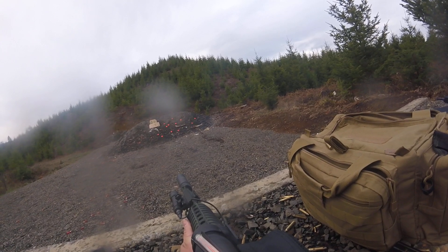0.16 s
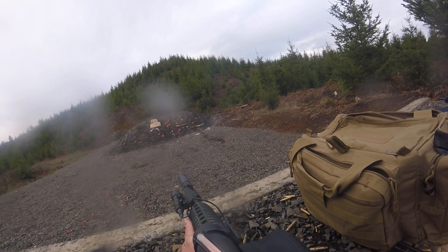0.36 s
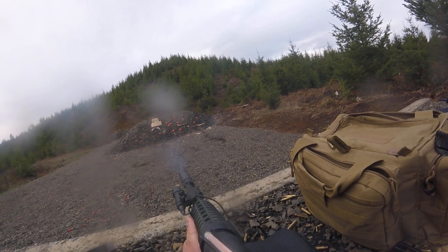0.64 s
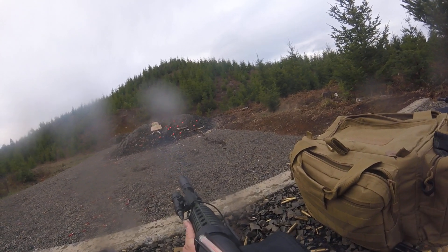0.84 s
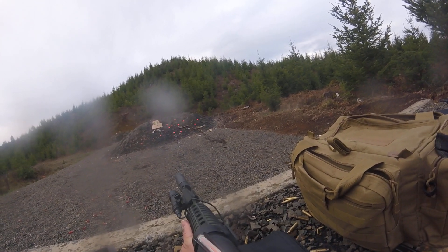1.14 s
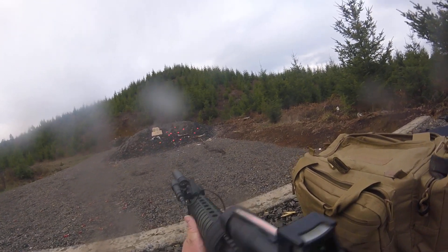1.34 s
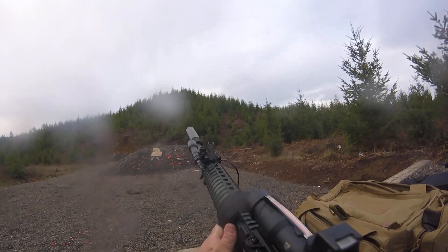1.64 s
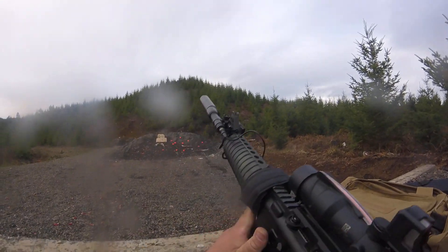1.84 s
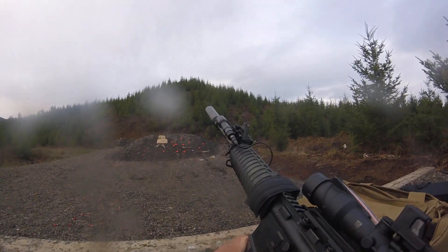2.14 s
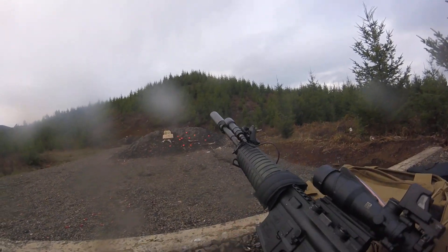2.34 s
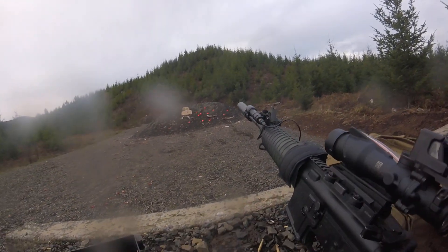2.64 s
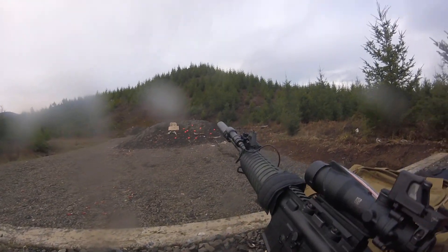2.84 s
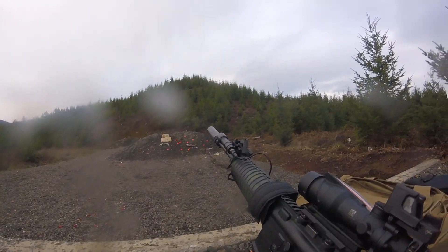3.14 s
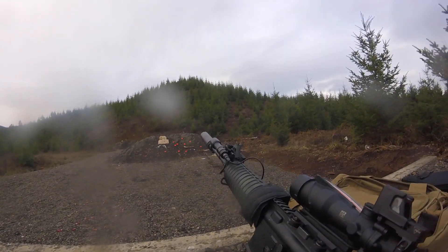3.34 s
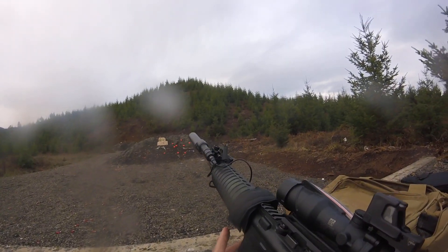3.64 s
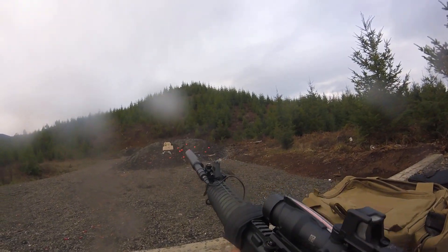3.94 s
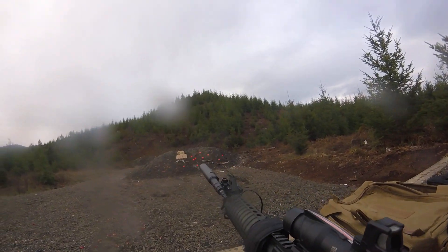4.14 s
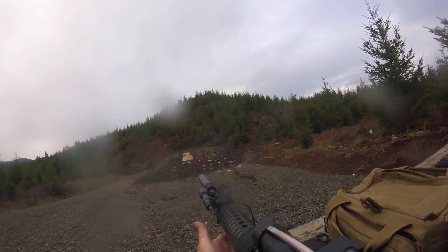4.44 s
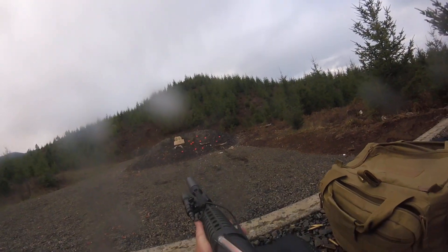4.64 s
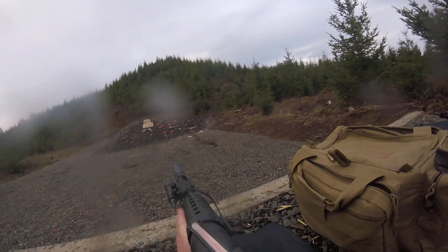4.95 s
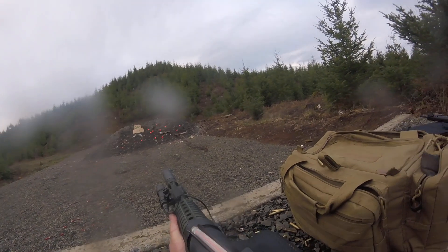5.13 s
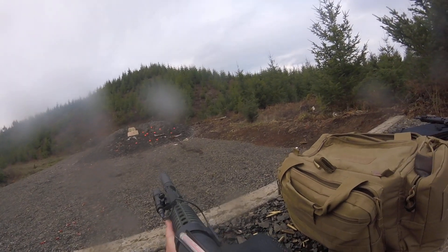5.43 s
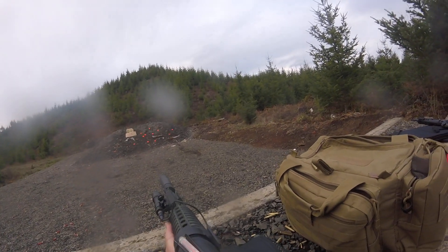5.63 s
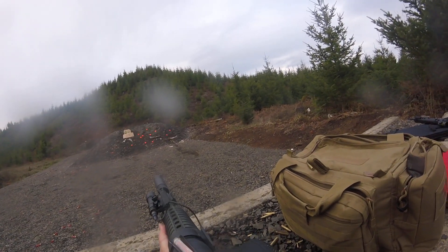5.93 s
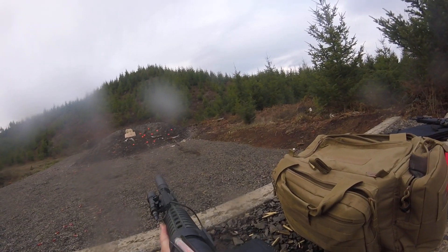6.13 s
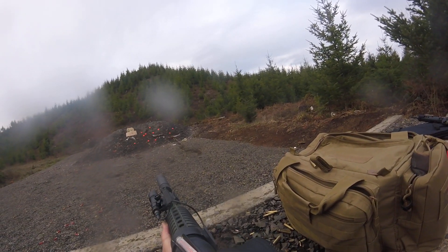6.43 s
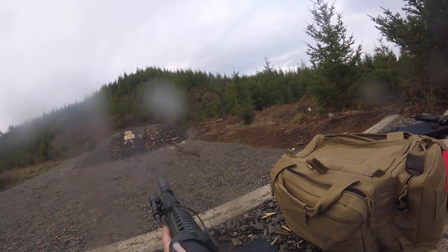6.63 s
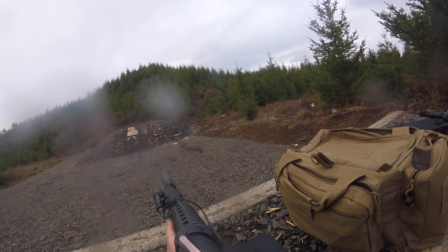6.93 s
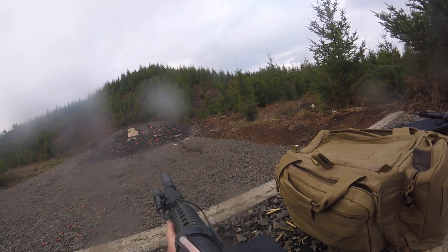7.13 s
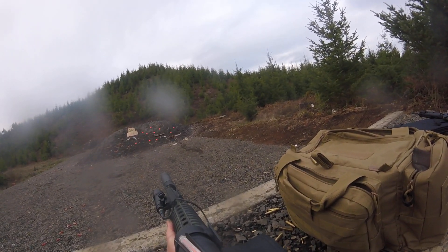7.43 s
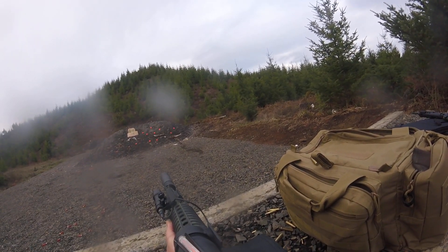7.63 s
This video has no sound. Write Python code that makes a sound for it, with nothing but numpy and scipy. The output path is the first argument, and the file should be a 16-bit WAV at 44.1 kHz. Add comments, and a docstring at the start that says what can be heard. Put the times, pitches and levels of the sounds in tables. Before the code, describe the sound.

Heard from a camera worn by the shooter on a gravel range beside a forest: a suppressed rifle shot cracks early, with quick bolt clatter, spring buzz and a short tree echo. Light clicks, rubs and small knocks of a reload follow, ending in a loud metallic bolt slam. After a quiet hold comes a second, slightly hissier shot with its action noise. Faint outdoor air and low wind rumble run underneath, ducked after the bangs.

```python
"""Two suppressed rifle shots, each with its cycling action, and a reload of clicks, rubs and pings between.
Place: a gravel range by a forest, heard from a camera worn by the shooter. Gas noise, a pressure pulse and
chamber rings make the blasts; short noise pushes through resonances make the metal; faint decaying noise is
the forest's scatter, steady noise the outdoor air. The camera's limiter ducks that air after each loud bang."""
import sys
import numpy as np
from scipy import signal
from scipy.fft import rfft, irfft
from scipy.io import wavfile
from scipy.ndimage import uniform_filter1d, minimum_filter1d

SR = 44100
rng = np.random.default_rng(int(sys.argv[2]) if len(sys.argv) > 2 else 0)


def waveform_to_disk(signal):
    """Save audio, clipped to [-1, 1], as 16-bit WAV at the path in sys.argv[1]."""
    frames = np.transpose(np.atleast_2d(signal))
    scaled = np.clip(frames, -1, 1) * 32767
    samples = np.round(scaled).astype(np.int16)
    wavfile.write(sys.argv[1], SR, samples)


N = 343098
SIZE = 8192  # samples in one short sound and in one filter
TIME = np.arange(N) / SR


def undb(db):
    """Decibels to gain."""
    return 10 ** (np.asarray(db) / 20)


def unit(x, span=None):
    """Scale to rms 1, over the first span seconds if given."""
    head = x if span is None else x[:int(span * SR)]
    return x / np.sqrt(np.mean(head ** 2) + 1e-18)


def add(out, start, x):
    """Mix x into out from time start."""
    i = max(int(start * SR), 0)
    out[i:i + len(x)] += x[:len(out) - i]


def curve(rows):
    """Gain over time from (s, dB) rows."""
    return undb(np.interp(TIME, *np.transpose(rows)))


def fade(t, t60):
    """Exponential decay, down 60 dB after t60 seconds."""
    return np.exp(-np.log(1000) * t / max(t60, 1e-4))


def shape(points, size=SIZE):
    """Gain per frequency bin from (Hz, dB) points, joined along log frequency."""
    hz, db = np.transpose(points)
    bins_hz = np.fft.rfftfreq(size, 1 / SR) + 1
    return undb(np.interp(np.log(bins_hz), np.log(hz), db))


def resonances(modes, size=SIZE):
    """Power per frequency bin of (Hz, width Hz, dB) resonances."""
    f = np.fft.rfftfreq(size, 1 / SR) + 1
    return sum(undb(db) ** 2 / (1 + ((f / hz - hz / f) * hz / width) ** 2) for hz, width, db in modes)


def response(gain):
    """Causal, minimum-phase impulse response with the given gain per bin."""
    cepstrum = irfft(np.log(gain + 1e-9))
    half = len(cepstrum) // 2
    cepstrum[1:half] *= 2
    cepstrum[half + 1:] = 0
    return irfft(np.exp(rfft(cepstrum)))


def colour(x, gain):
    """Pass x through a causal filter."""
    return signal.fftconvolve(x, response(gain))[:len(x)]


def unevenness(burst):
    """Broad chance colour of a noise burst; dividing by it makes the burst drive all frequencies evenly."""
    return np.sqrt(uniform_filter1d(np.abs(rfft(burst)) ** 2, size=60))


# spectrum of the gas leaving the suppressor: pitch_hz, level_db
GAS = [(250, -20), (540, -20), (700, -5.5), (980, -7.5), (1400, -1.5), (1950, -6.5), (2300, -8),
       (3000, -9.5), (3700, -7.5), (4200, -18), (6400, -12.5), (7400, -26.5), (15000, -38.5)]
# chamber resonances of the suppressor, rung by the pressure pulse: pitch_hz, level_db, t60_s
CHAMBERS = [(770, -5, 0.02), (1235, -4.5, 0.015)]


def blast(gas_t60, whistle_db, whistle_hz=3570, whistle_width_hz=260,
          push_db=-4.0, push_s=.0009, push_hz=400, gas_delay=0.0022,
          spill_db=-16.5, spill_t60=0.14, spill_low_db=-7, spill_treble_db=2):
    """A pressure pulse leaves the muzzle and rings the suppressor; a jet of gas follows and spills over the ground."""
    t = TIME[:SIZE]
    pulse = (1 - t / push_s) * np.exp(-t / push_s)
    pulse = signal.sosfilt(signal.butter(2, push_hz, fs=SR, output="sos"), pulse)
    ring = sum(undb(db) * np.sin(2 * np.pi * hz * t) * fade(t, t60) for hz, db, t60 in CHAMBERS)

    onset = np.minimum(t / gas_delay, 1) ** 2
    late = np.maximum(t - gas_delay, 0)
    jet = onset * fade(late, gas_t60) * rng.standard_normal(SIZE)
    spill = onset * fade(late, spill_t60) * rng.standard_normal(SIZE)

    # the jet whistles in the suppressor; what comes back off the gravel has a different, thinner colour
    whistle = resonances([(whistle_hz, whistle_width_hz, whistle_db)])
    can = np.sqrt(shape(GAS) ** 2 + whistle)
    gravel = shape(GAS) * shape([(800, spill_low_db), (1500, 0.0026), (5000, spill_treble_db)])
    gas = unit(colour(jet, can / unevenness(jet)), span=0.007)
    gas += undb(spill_db) * unit(colour(spill, gravel), span=0.008)
    return gas - ring - undb(push_db) * pulse / np.abs(pulse).max()


# the shots, levels as they reach the microphone before the limiter: start_s, level_db, gas_t60_s, whistle_db,
# forest_db, travel_s (bolt back and forth), return_db (force of the bolt's return)
SHOTS = [(0.6910, 4, .013, 7.5, 2.5, .034, -6.5), (6.579, 2.5, 0.021, 0, 3.5, .051, 1)]
# unlock, rear stop, feed, lock, rebound: share of travel_s, level_db (before return_db), body_db, treble_db, t60_s
ACTION = [(0, -18.5, 3.5, 1.5, .05), (.59, -27, -4, -6, .03), (.76, -27.5, -6, -4.5, .035),
          (1.001, -19, -8, -5, .02), (2, -39.5, -25, -8, .06)]
UNLOCK_S = .021  # from the shot until the bolt starts to move


def action():
    """After each shot the bolt unlocks, hits the rear stop, feeds a round, locks again and rebounds."""
    out = np.zeros(N)
    for shot_s, *_, travel_s, return_db in SHOTS:
        for share, db, body_db, treble_db, t60 in ACTION:
            start = shot_s + UNLOCK_S + share * travel_s
            level_db = db + min(share, 1) * return_db  # the force of the return tells more and more
            add(out, start, undb(level_db) * knock(body_db, treble_db, t60))
    return out


# the bolt carrier jolts the rifle: start_s, spring_db, thump_db, thump_t60_s
CYCLES = [(0.716, -46, -18, 0.23), (4.237, -50.5, -27, 0.137), (6.611, -42, -18.5, 0.39)]
# crowded mode clusters of the buffer spring: pitch_hz, width_hz, level_db
SPRING = [(1590, 60, -3.5), (1940, 60, -3.5), (2340, 170, -5.5), (3070, 63, 5), (3630, 400, -1.5),
          (4280, 150, -6.5), (5348, 130, -1.5), (6170, 350, -10), (7550, 350, -9.5), (9400, 400, -19),
          (13000, 900, -24.5)]


def recoil(buzz_s=.095, rattle_db=3, thump_hz=38, rise_s=0.011):
    """The buffer spring rattles in its tube until friction stops it; the jolt reaches the camera through the body."""
    out, t = np.zeros(N), TIME[:SR // 2]
    for start, spring_db, thump_db, thump_t60 in CYCLES:
        rattle = undb(rattle_db * unit(uniform_filter1d(rng.standard_normal(len(t)), size=90)))
        buzz = unit(colour(rattle * rng.standard_normal(len(t)), np.sqrt(resonances(SPRING))))
        buzz = buzz * np.exp(-(t / buzz_s) ** 2)
        thump = -np.sin(2 * np.pi * thump_hz * t) * fade(t, thump_t60)
        jolt = undb(spring_db) * buzz + undb(thump_db) * thump
        add(out, start, np.minimum(t / rise_s, 1) * jolt)
    return out


# resonances of receiver and magazine: pitch_hz, width_hz, level_db
RECEIVER = [(1160, 43, -14.5), (1390, 91, -2.5), (1555, 70, 1.5), (2090, 140, -7), (2430, 59, -5.5),
            (3080, 130, -6.5), (3365, 125, 2.5), (3700, 130, -2.5), (4910, 170, -7), (5380, 120, -7),
            (6538, 140, -18), (6890, 420, -16)]
# the bare click of steel on steel: pitch_hz, level_db
CLICK = [(100, -34.5), (600, -26), (1100, -13.5), (3000, -17), (6500, -14), (8500, -30.5), (12500, -33.5),
         (15000, -37)]


def receiver(spread_db=0, bass_db=-8):
    """Gain per bin of the rifle: click plus resonances, each scattered by spread_db; small parts radiate little bass."""
    modes = [(hz, width, db + spread_db * rng.standard_normal()) for hz, width, db in RECEIVER]
    return np.sqrt(resonances(modes) + shape(CLICK) ** 2) * shape([(500, bass_db), (1050, 0.0016)])


def knock(body_db, treble_db, t60, body_share=0.66, treble_share=.55, middle_db=1.25, spread_db=0.95,
          chatter_db=4, tail_db=-27, tail_t60=0.093, rise_s=.0014):
    """One contact: a brief chatter that rings the receiver, with a weak tail off the ground and gear."""
    t = TIME[:SIZE]
    grain, size = rng.standard_normal((2, SIZE))
    chatter = undb(chatter_db * size) * fade(t, t60)
    tail = undb(tail_db) * fade(t, tail_t60)
    contact = grain * np.minimum(t / rise_s, 1) * (chatter + tail)
    # the place of the blow decides which resonances take up the energy
    middle = middle_db + body_share * body_db + treble_share * treble_db
    place = shape([(1700, body_db), (2000, middle), (2600, middle),
                   (3000, 0), (4000, 0.00023), (4900, treble_db)])
    return unit(colour(contact, receiver(spread_db) * place / unevenness(contact)), span=0.0089)


# metal parts knock together, mostly during the reload: start_s, level_db,
# body_db and treble_db (both relative to the receiver's main ring)
KNOCKS = [(1.248, -52.5, -5, -7), (1.438, -55.5, -4, 9), (1.635, -53, 14, -4), (1.97, -53, 7.5, -6),
          (2.065, -49.5, -5, 7), (2.069, -43, 10, -1), (2.1, -52, -9, -9), (2.139, -52.5, -6, -11),
          (2.328, -54.5, 3, 5), (2.375, -49.5, 1, -5), (2.562, -52, -2, -8), (2.591, -43.5, 5, 2),
          (2.61, -42, 5, -7), (2.647, -35, -0.5, -8), (2.654, -37.5, 1, -1), (2.687, -41, -7, -14),
          (2.698, -34.5, 9, -1.5), (2.7444, -44.5, 9, -7), (2.758, -47, 15, -13), (2.772, -46.5, 13, -3),
          (2.814, -43.5, 0, 7), (2.839, -43.5, 20, 5), (3.292, -45, 10, -1.5), (3.444, -48, 5, -7.5),
          (3.526, -48.5, 5, 1), (3.555, -52, -1, -7), (3.581, -36.5, 5, 4.5), (3.598, -50, 16, 0),
          (4.04, -57, 12, -11), (4.166, -35, -2.5, -0.5), (4.182, -32, 1.5, -10), (4.198, -38, 9, -3),
          (4.205, -29.5, 14, -5), (4.213, -35.5, 12, 7), (4.23, -31, 3.5, -2.5), (4.2342, -16.5, -2, -8.5),
          (4.413, -59.5, 9.5, -6), (4.525, -55, 1.5, -3), (4.698, -60, -5, -1), (4.8733, -47, -10.5, -4.5),
          (4.983, -51, -14.5, -4), (5.1475, -54.5, -8, 5.5), (6.741, -36.5, -4, -2.5)]
CONTACT_T60_S = 0.028  # decay of a middling knock; dull blows last longer, hard ones are briefer


def knocks(middling_db=-45, body_db_per_doubling=28, level_db_per_halving=36, settle_s=.014,
           settle_db=-11, settle_max_db=-49, settle_body_db=5, settle_treble_db=-5):
    """Each part strikes, then settles with a second, softer and duller touch."""
    out = np.zeros(N)
    for start, db, body_db, treble_db in KNOCKS:
        doublings = body_db / body_db_per_doubling - (db - middling_db) / level_db_per_halving
        t60 = CONTACT_T60_S * 2 ** doublings
        add(out, start, undb(db) * knock(body_db, treble_db, t60))
        touch = knock(body_db + settle_body_db, treble_db + settle_treble_db, t60)
        touch_db = min(db + settle_db, settle_max_db)
        add(out, start + settle_s * rng.uniform(0.57, 1.5), undb(touch_db) * touch)
    return out


# a small steel catch snaps: start_s, level_db
CATCHES = [(1.395, -57), (2.138, -48.5), (4.727, -38), (4.746, -41)]
# its resonances: pitch_hz, width_hz, level_db
CATCH = [(3500, 190, -7.5), (5100, 107, 2), (5280, 120, -15), (6170, 110, -8)]


def catches():
    """A short push on the small steel catch rings its narrow resonances."""
    return struck(CATCHES, CATCH, push_t60=0.014)


# dull blows on stock and magazine: start_s, level_db
THUDS = [(0.746, -34), (2.773, -54), (2.841, -46), (2.855, -48.5), (3.583, -50.5), (6.631, -37),
         (6.652, -41.5), (6.741, -51)]
# resonances of the polymer parts: pitch_hz, width_hz, level_db
POLYMER = [(331.4, 79, -6), (442, 110, -3.5), (660, 97, -3.5)]


def thuds():
    """A blow on the polymer parts excites their low, quickly damped resonances."""
    return struck(THUDS, POLYMER, push_t60=0.012)


# faint ticks while the shooter holds still: start_s, level_db
TICKS = [(0.383, -62.5), (7.48, -65.5)]
# their resonances: pitch_hz, width_hz, level_db
TICK = [(3230, 34, -2), (3740, 32, 8)]


def ticks():
    """A very short push rings two close, narrow resonances."""
    return struck(TICKS, TICK, push_t60=0.0078)


def struck(events, modes, push_t60):
    """Short noise pushes at (s, dB) on a part with the given resonances."""
    out, t = np.zeros(N), TIME[:SIZE]
    for start, db in events:
        push = rng.standard_normal(SIZE) * fade(t, push_t60)
        add(out, start, undb(db) * unit(colour(push, np.sqrt(resonances(modes))), span=0.003))
    return out


# a small metal fitting is jogged: start_s, level_db
PINGS = [(0.745, -62), (1.44, -60), (2.712, -67), (4.875, -62.5), (4.986, -64.5), (5.2, -75),
         (6.779, -65.5)]
# its modes: pitch_hz, level_db, t60_s
FITTING = [(11030, -19, 0.42), (11300, 2, 0.36), (11600, -11.5, 0.75), (14980, -10, 0.25),
           (15300, -12, 0.079)]


def fitting(spread_db=3, flutter_db=3):
    """Thin high pings that flutter as the part dangles; every jog shares its energy differently among the modes."""
    out, t = np.zeros(N), TIME[:SR // 2]
    for start, db in PINGS:
        for hz, mode_db, t60 in FITTING:
            share, *sway = rng.standard_normal(31)
            sway_db = flutter_db * np.interp(t, np.linspace(0, t[-1], len(sway)), sway)
            gain = undb(db + mode_db + spread_db * share + sway_db)
            add(out, start, gain * np.sin(2 * np.pi * hz * t) * fade(t, t60))
    return out


# the rifle is rolled over and back: start_s, in_motion_s, slowing_s, at_rest_s
HANDLING = (1.15, 1.35, 5.15, 5.6)
GRIP_DB = -75  # hands shifting on the rifle all the while, relative to the same level as the slides
# longer slides of hands and magazine: middle_s, half_length_s, level_db (relative)
SLIDES = [(1.55, 0.2, -69), (2.206, 0.26, -71.5), (2.726, 0.12, -54), (3.473, 0.078, -74),
          (4.72, 0.09, -67.5)]


def handling():
    """Strength of the sliding contact: a steady grip, with a smooth swell for each slide."""
    grip = undb(GRIP_DB) * np.interp(TIME, HANDLING, [0, 1, 1, 0])
    return grip + sum(undb(db) * np.exp(-((TIME - middle) / half) ** 2) for middle, half, db in SLIDES)


def rubbing(grain_db=7, level_db=-2):
    """Sliding contact: dense tiny catches through the receiver's resonances."""
    steps = grain_db * np.clip(rng.standard_normal(N // 64 + 1), -2, 2)
    grain = np.repeat(undb(steps), 64)[:N]  # a new strength every 64 samples
    return unit(colour(grain * rng.standard_normal(N), receiver())) * handling() * undb(level_db)


def clatter(count=26, above_rub_db=4.0, scatter_db=1.2, body_scatter_db=7, treble_db=-4):
    """Loose parts tick at random while the rifle moves, louder during the slides."""
    out, strength = np.zeros(N), handling()
    for slot in range(count):
        start = np.interp(slot + rng.random(), [0, count], [HANDLING[0], HANDLING[2]])
        size, body = rng.standard_normal(2)
        gain = np.interp(start, TIME, strength) * undb(above_rub_db + scatter_db * size)
        add(out, start, gain * knock(body_scatter_db * body, treble_db, CONTACT_T60_S))
    return out


# spectrum of the scatter from the forest: pitch_hz, level_db
FOREST = [(500, -35), (1100, -14.5), (1600, 2.5), (2400, -1.5), (3600, 3.5), (4300, -9), (6600, -10.5),
          (8000, -21.5), (15000, -37)]
# stands of trees that throw the shot back: delay_s, level_db (before the shot's forest_db), t60_s
TREES = [(0.035, -41, 0.75), (0.135, -42, 0.34), (0.29, -56.5, 1.21)]


def forest(build_s=0.021, patchy_db=2.68, air_loss_db_per_s=36):
    """Each stand of trees returns a cloud of weak echoes; the longer the path, the more treble the air takes."""
    out, t = np.zeros(2 * SR), TIME[:SR]
    for delay, db, t60 in TREES:
        clumps = undb(patchy_db * unit(uniform_filter1d(rng.standard_normal(SR), size=400)))
        absorbed = shape([(3500, 0.00043), (7000, -air_loss_db_per_s * delay)])
        echoes = unit(colour(rng.standard_normal(SR), shape(FOREST) * absorbed))
        envelope = np.minimum(t / build_s, 1) * fade(t, t60)
        add(out, delay, undb(db) * echoes * clumps * envelope)
    return out


# air buffeting the camera, higher while the shooter moves: time_s, level_db (before buffet_db and gusts)
BUFFET = [(0, -51), (1.05, -53), (1.4, -42), (2.5, -44), (4.1, -47), (4.9, -38), (5.2, -44.5), (6.1, -53),
          (7.75, -53)]
# spectrum of the buffeting: pitch_hz, level_db
RUMBLE = [(12, 1.5), (25, 3.5), (42, 1), (65, -12), (110, -25.5), (250, -35.5), (700, -64)]
# spectrum of the steady outdoor air: pitch_hz, level_db
AIR = [(30, 2.5), (70, 3), (130, -1), (300, -7.5), (600, -11.5), (1500, -16.5), (3500, -22), (7000, -29.5),
       (10000, -33.5), (12500, -40), (15000, -55)]
AIR_DB = -60  # rms of the steady air before the limiter


def air(buffet_db=-2.3, gust_db=2.0, gusts_per_s=6):
    """Faint steady outdoor hiss, and low gusty buffeting that grows while the shooter moves."""
    hiss = unit(colour(rng.standard_normal(N), shape(AIR)))
    rumble = unit(colour(rng.standard_normal(N), shape(RUMBLE)))
    gusts = np.interp(TIME * gusts_per_s, np.arange(SIZE), rng.standard_normal(SIZE))
    return undb(AIR_DB) * hiss + undb(buffet_db + gust_db * gusts) * curve(BUFFET) * rumble


def scene():
    """Shots, action and handling over the forest's scatter and the outdoor air."""
    out = action() + recoil() + knocks() + catches() + thuds() + ticks()
    out += fitting() + rubbing() + clatter() + air()
    for start, db, gas_t60, whistle_db, forest_db, *_ in SHOTS:
        add(out, start, undb(db) * blast(gas_t60, whistle_db))
        add(out, start, undb(forest_db) * forest())
    return out[None]


def limiter(x, ceiling=0.87, release_db_per_s=19):
    """Looks a few milliseconds ahead, pulls the gain down quickly and lets it creep back."""
    over_db = np.maximum(20 * np.log10(np.abs(x) / ceiling + 1e-9), 0)
    ramp = release_db_per_s * TIME
    gain_db = ramp - np.maximum.accumulate(over_db + ramp)
    return x * undb(uniform_filter1d(minimum_filter1d(gain_db, size=200), size=200))


TOP_HZ = 15350  # upper edge of what the camera passes


def record(dry, overload=12.0):
    """The microphone rounds the blasts, the limiter holds them, their last tips are clipped and the top is cut."""
    rounded = overload * np.tanh(dry[0] / overload)
    held = np.clip(limiter(rounded), -.71, .71)
    return signal.sosfilt(signal.ellip(8, .2, 70, TOP_HZ, fs=SR, output="sos"), held)[None]


dry = scene()
out = record(dry)
waveform_to_disk(out)
```